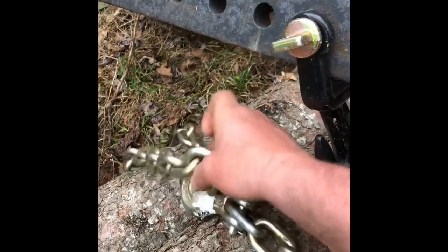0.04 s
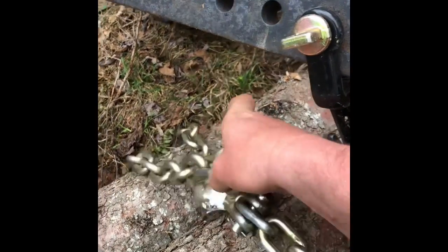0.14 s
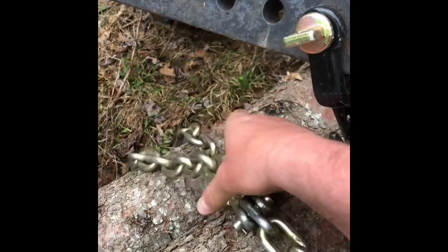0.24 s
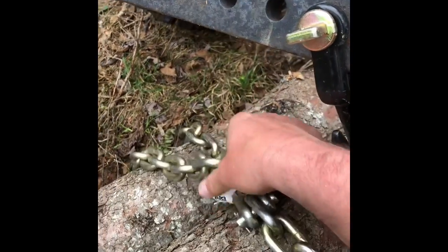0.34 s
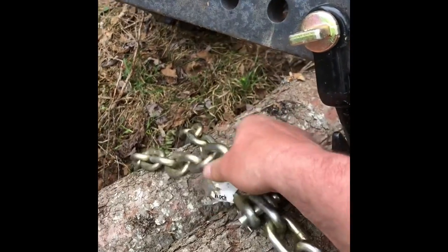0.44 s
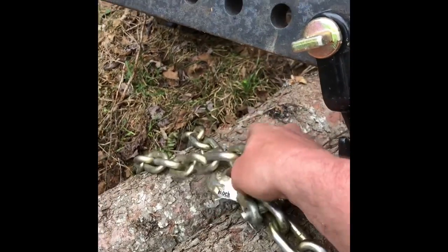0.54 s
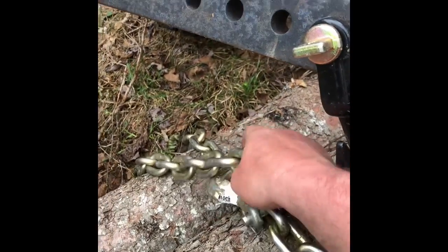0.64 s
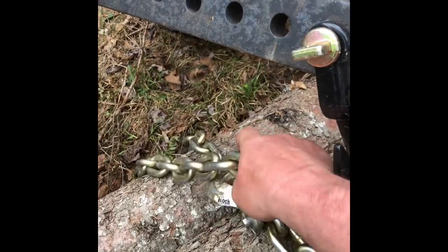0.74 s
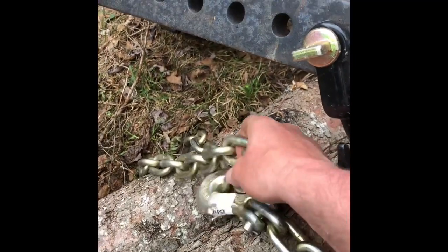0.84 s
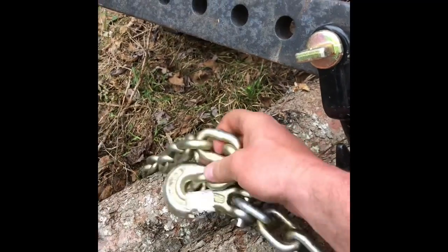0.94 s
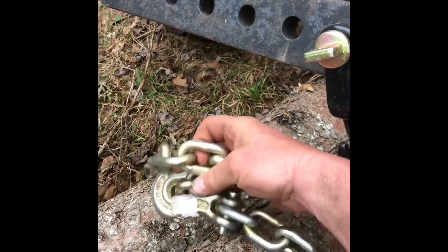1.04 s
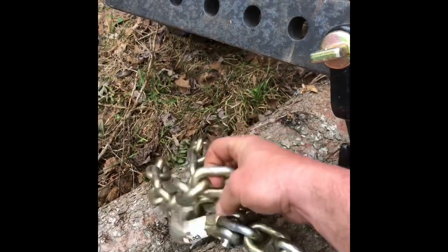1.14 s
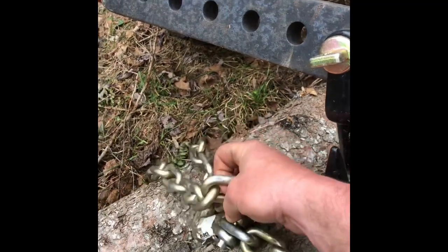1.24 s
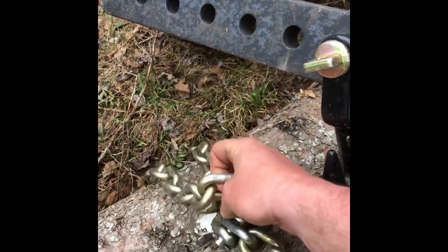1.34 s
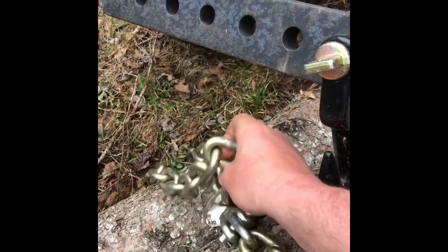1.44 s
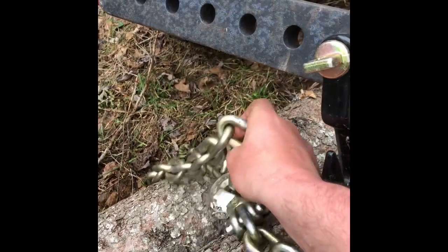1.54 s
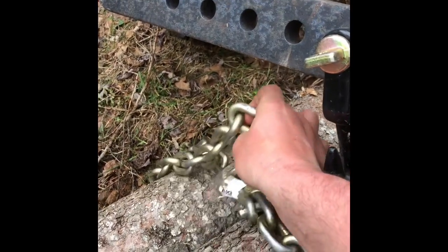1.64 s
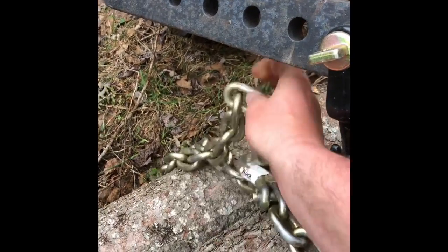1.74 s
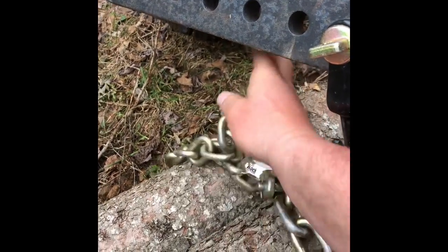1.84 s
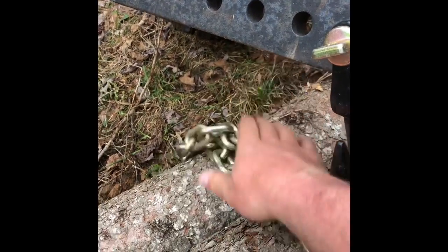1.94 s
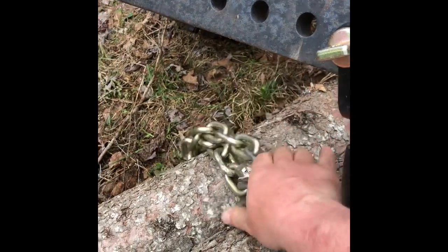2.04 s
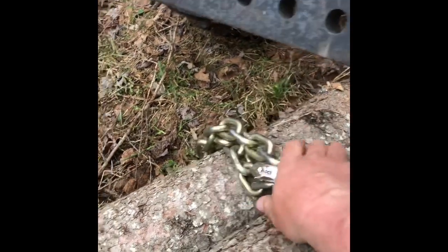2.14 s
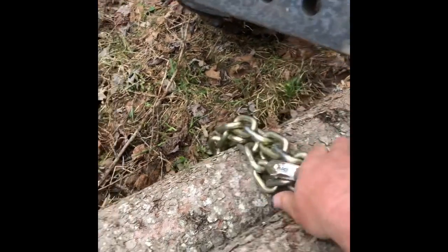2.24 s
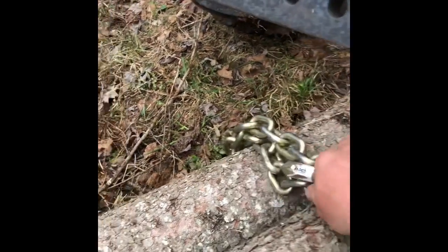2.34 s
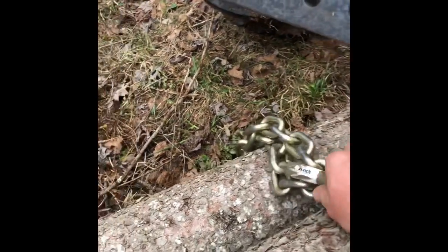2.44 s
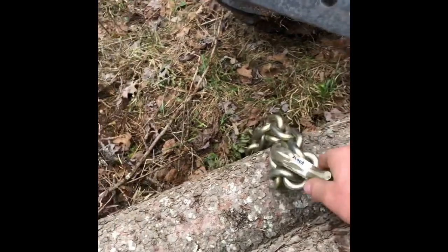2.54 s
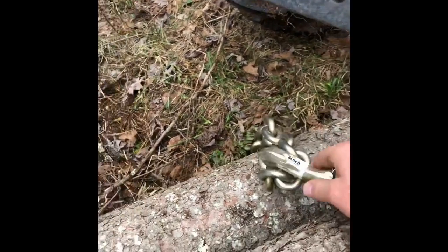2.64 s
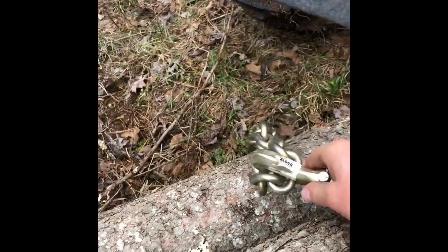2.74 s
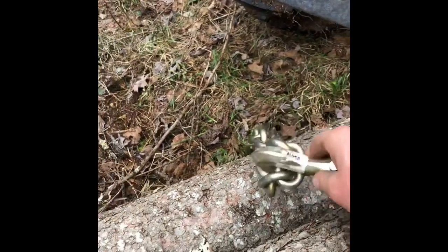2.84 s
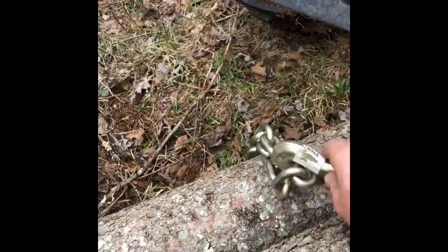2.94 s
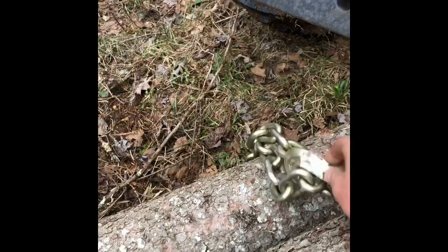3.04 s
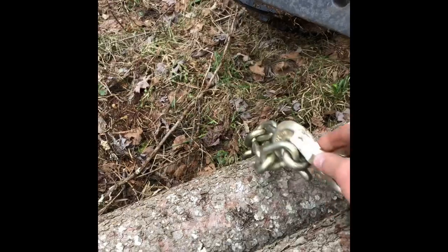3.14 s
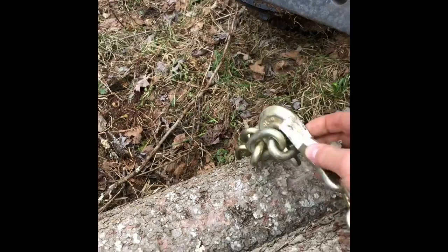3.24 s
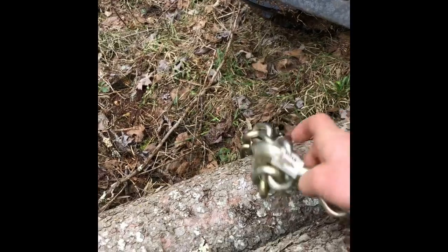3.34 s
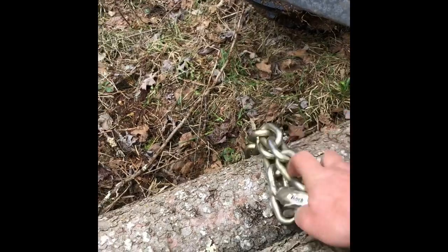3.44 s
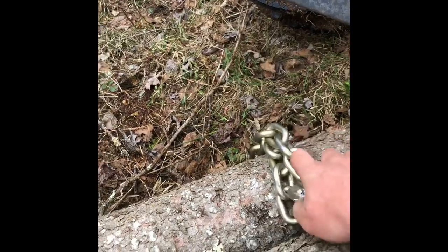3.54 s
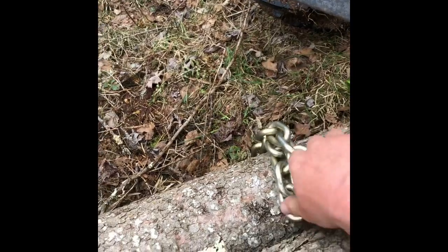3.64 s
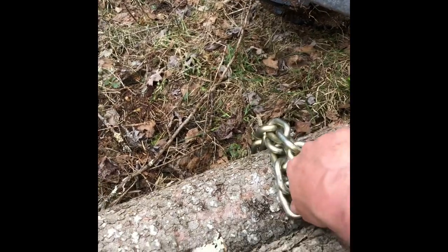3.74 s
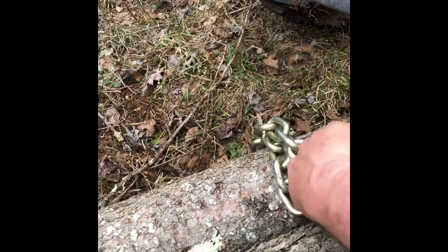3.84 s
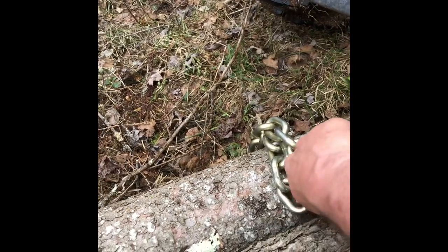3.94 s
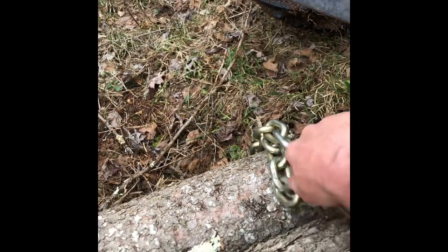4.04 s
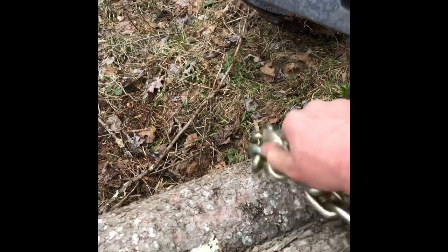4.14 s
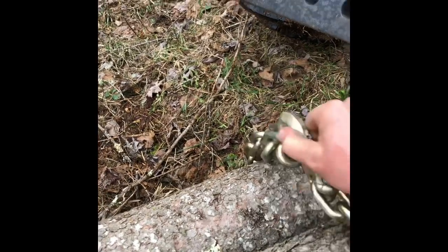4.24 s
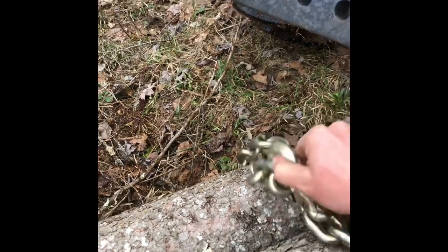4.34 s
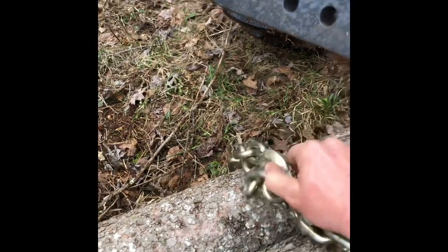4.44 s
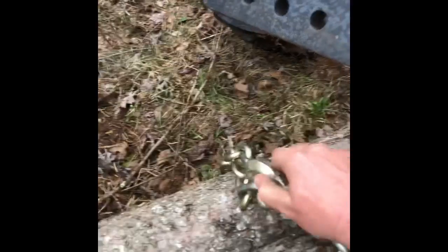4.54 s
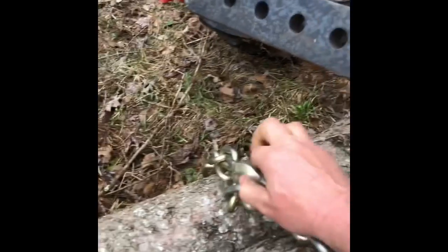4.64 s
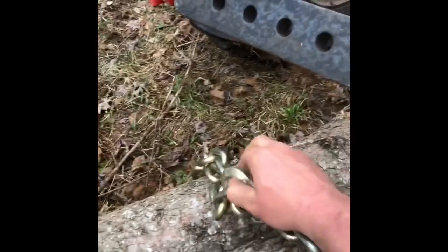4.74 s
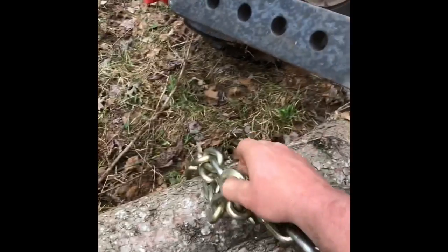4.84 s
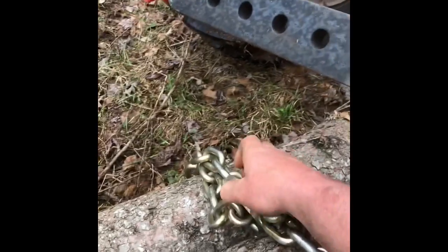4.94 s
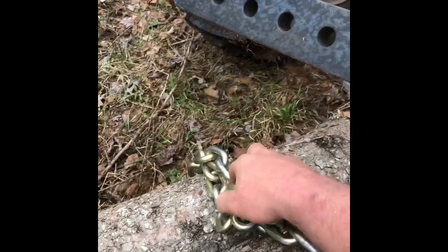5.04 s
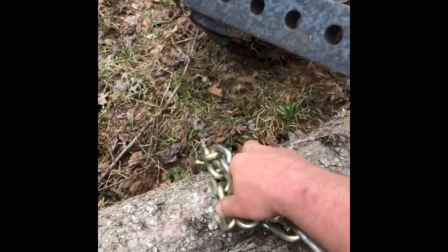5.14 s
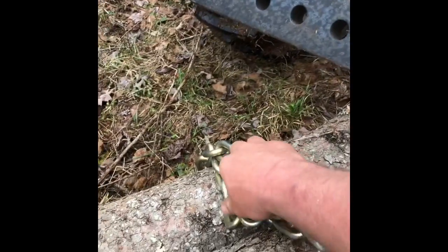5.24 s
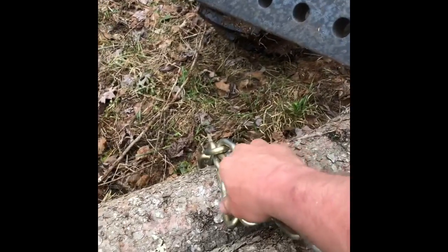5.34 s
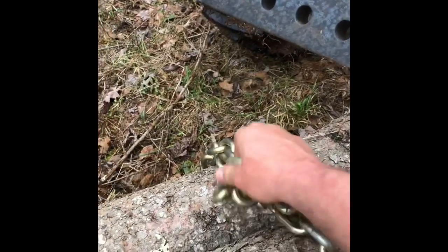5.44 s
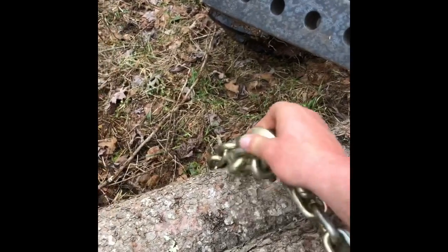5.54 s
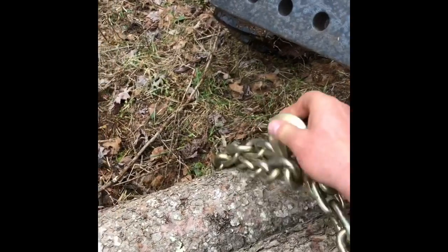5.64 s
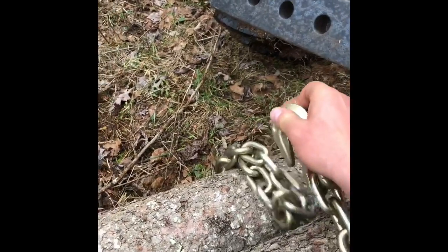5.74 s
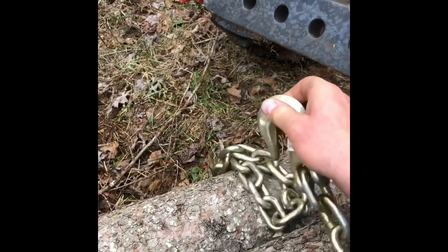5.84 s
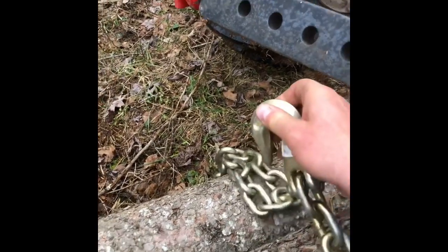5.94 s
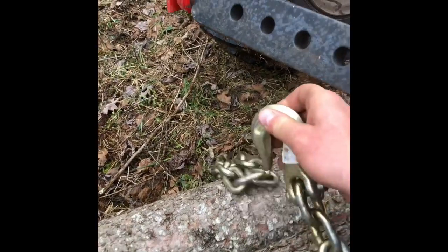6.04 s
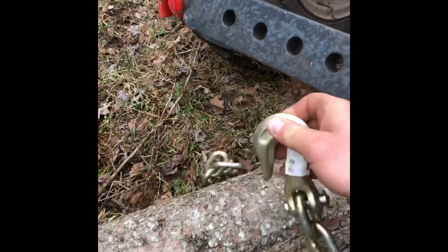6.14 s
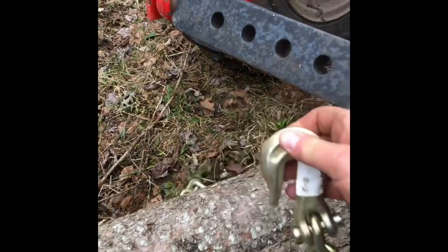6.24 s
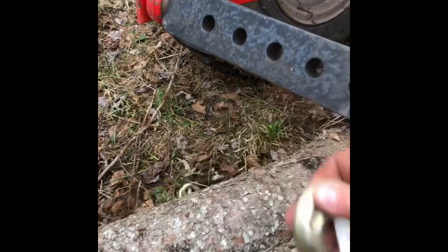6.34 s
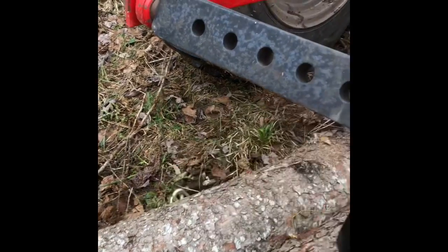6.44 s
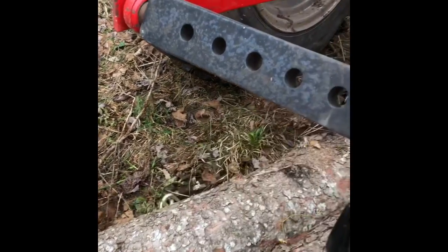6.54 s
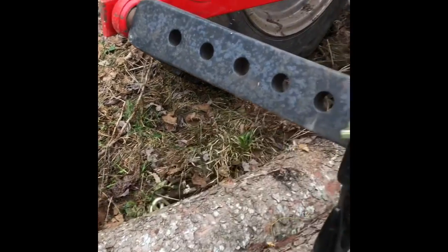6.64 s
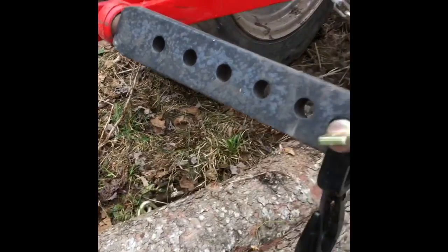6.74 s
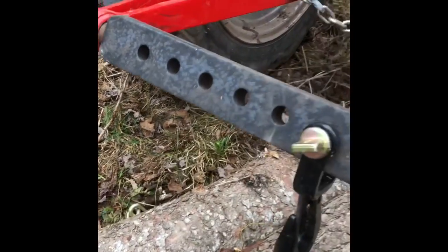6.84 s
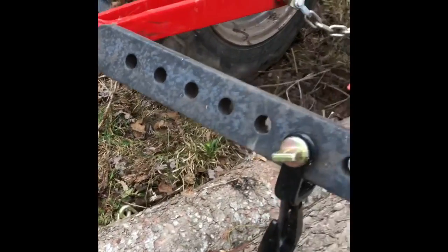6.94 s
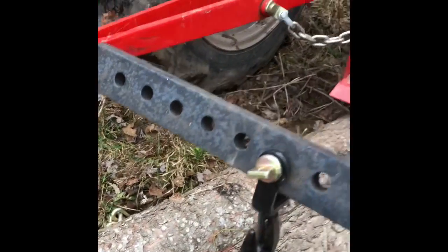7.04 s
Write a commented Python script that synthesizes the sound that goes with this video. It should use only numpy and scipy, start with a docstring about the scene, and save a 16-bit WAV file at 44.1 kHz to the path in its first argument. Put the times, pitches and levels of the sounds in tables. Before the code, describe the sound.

Very close to the microphone, a hand works a steel chain and grab hook round a log in quiet woods. Sharp link ticks and hook clinks cluster early, then a bright jingling rush. Sparser ticks, a hard clank and light fumbling follow, before a loud scrape with thumps and shimmering loose links. A last few hook clinks fade into near silence.

```python
"""A steel chain scrapes and ticks round a log in the woods, over a quiet outdoor floor; a hand works its grab hook.
Scrapes are filtered clicks and noise; link ticks are noise cracks with very high, beating modes.
The heavier hook rings lower when struck: dying sines, shorter and rougher the firmer the grip.
Low thumps and knocks are dying cosines; far metal bangs are noise with resonances and an echo among the trees.
Loose links jingle very high in three runs: random knocks ring six links of slightly different size."""
import sys
import numpy as np
from scipy import signal
from scipy.io import wavfile
from scipy.ndimage import uniform_filter1d, minimum_filter1d

SR = 44100
rng = np.random.default_rng(int(sys.argv[2]) if len(sys.argv) > 2 else 0)


def put_to_file(sound):
    """Save the sound as 16-bit audio at rate SR, in the file named by the first command-line argument."""
    columns = np.atleast_2d(sound).T  # one column per channel
    safe = np.clip(columns, -1, 1)
    whole_steps = np.round(safe * 32767)
    wavfile.write(sys.argv[1], SR, whole_steps.astype(np.int16))


N = 313098

# Modes of one link. Each row: frequency in Hz, relative level in dB.
LINK_MODES = [(12910, 0), (13370, -11), (13690, -2), (14500, -1), (14790, -4)]
# Hook modes, one family per plane of bending. Each row: frequency in Hz, relative level in dB.
HOOK_PLANES = [
    [(4118, -9), (5523, 0.5), (7300, -6), (10180, -8.5)],
    [(3865, -18), (5200, -1), (7100, -5), (10430, -5.5)],
]
# Spectrum of a steel crack. Each row: frequency in Hz, relative density in dB per Hz.
CRACK_SPECTRUM = [(410, -65.5), (700, -34.5), (5220, -7.5), (11400, -0.5), (13200, -15.5), (14900, -8),
                  (16800, -25.5)]
# Spectrum of a scrape. Each row: frequency in Hz, relative density in dB per Hz.
SCRAPE_SPECTRUM = [(150, -13.5), (500, -10), (1310, -12.5), (4360, -2), (12300, -1.5), (13200, 1),
                   (15800, -3), (16500, -34.5)]
LINK_SPREAD = .0022   # size scatter, as a fraction


def amp(db):
    """dB to gain."""
    return 10 ** (np.asarray(db) / 20)


def unit(x):
    """Scale to rms 1."""
    return x / np.sqrt(np.mean(x ** 2) + 1e-20)


def curve(rows):
    """Interpolate (seconds, value) rows at every sample."""
    s, value = np.transpose(rows)
    return np.interp(np.arange(N) / SR, s, value)


def sos_filter(x, order, hz, kind="low"):
    """Butterworth filter."""
    return signal.sosfilt(signal.butter(order, hz, kind, fs=SR, output="sos"), x)


def colour(x, spectrum):
    """Minimum-phase filter of unit energy through (Hz, dB) points, linear in log frequency."""
    hz, db = np.transpose(spectrum)
    grid_hz = np.linspace(0, SR / 2, 1025)
    gain = amp(np.interp(np.log(grid_hz + 1), np.log(hz), db))
    # minimum_phase takes the square root of the response, hence gain squared
    linear = signal.firwin2(2047, grid_hz, gain ** 2, fs=SR)
    taps = signal.minimum_phase(linear, n_fft=2 ** 15)
    taps = taps / np.sqrt(np.sum(taps ** 2))
    return signal.fftconvolve(x, taps)[:len(x)]


def drift(rate):
    """Random curve of rms 1 through rate knots a second (300 at most)."""
    knots = rng.standard_normal(int(N / SR * 300) + 2)
    return unit(np.interp(np.arange(N) / SR * rate, np.arange(len(knots)), knots))


def ring(x, hz, t60):
    """Two-pole resonator: a unit click starts a dying sine of initial height 1."""
    radius = amp(-60 / (t60 * SR))
    w = 2 * np.pi * hz / SR
    return signal.lfilter([0, np.sin(w)], [1, -2 * radius * np.cos(w), radius ** 2], x + 1e-18)


def grains(per_s, uneven_db):
    """Random clicks of uneven size and sign."""
    sizes = amp(uneven_db * np.minimum(rng.exponential(1, N), 3.5))
    sizes = sizes * rng.choice([-1, 1], N)
    return sizes * (rng.random(N) < per_s / SR)


def add(out, s, sound):
    """Mix a short sound in at s seconds."""
    i = int(round(s * SR))
    out[i:i + len(sound)] += sound[:N - i]


def struck(t, modes, t60, luck_db):
    """Dying sines with a soft onset; luck_db shares the force out among the modes."""
    hz, db = modes[:, :1], modes[:, 1:] + luck_db[:, None]
    onset = 1 - np.exp(-t / 0.00022)
    fade = amp(-60 * t / np.maximum(t60, .005)) * onset
    return np.sum(fade * amp(db) * np.sin(2 * np.pi * hz * t), axis=0)


def air():
    """Wind in leaves and far rumble: coloured noise, gently lumpy."""
    # Each row: frequency in Hz, relative density in dB per Hz.
    air_spectrum = [(20, -10), (65, 6.5), (168, 9.5), (806, -4.5), (1660, -2.5), (2850, -11), (4550, -33),
                    (7700, -120)]
    # Each row: time in seconds, level in dB.
    air_level = [(0.0, -47), (0.26, -59), (4.21, -60.5), (4.29, -56.5), (7.1, -67)]
    level_db = curve(air_level) + 0.5 * drift(rate=7.0)
    return amp(level_db) * unit(colour(rng.standard_normal(N), air_spectrum))


def rub_db():
    """Drag level: each tug swells and fades steadily in dB, on top of a faint shifting in the hand."""
    # Tugs over bark and chain. Each row: hardest moment in seconds, level in dB, swell and fade in seconds.
    tugs = [(0.0, -38.5, .1, 0.32), (0.59, -35, 0.054, 0.063), (0.746, -42.5, 0.096, 0.037),
            (0.887, -40.5, 0.061, 0.05), (1.193, -33, 0.24, 0.2), (1.89, -23, 0.089, 0.048),
            (1.97, -33, 0.088, 0.35), (2.101, -30.5, 0.06, 0.096), (3.15, -44, 0.54, 0.051),
            (3.503, -33.5, 0.29, 0.077), (4.13, -42.5, 0.062, 0.39), (4.455, -33.5, 0.46, 0.054),
            (5.074, -38, 0.035, 0.0071), (5.555, -42.5, 0.14, 0.094), (5.719, -20.5, 0.062, 0.014),
            (5.821, -22, 0.1, 0.047), (6.29, -29.5, 0.44, 0.27), (6.631, -30, 0.16, 0.054),
            (6.686, -26, 0.067, 0.14), (6.847, -36.5, 0.099, 0.22)]
    # Faint rub between tugs. Each row: time in seconds, level in dB.
    shifting = [(0, -74), (0.47, -54.5), (0.8, -72), (1.6, -59.5), (2.28, -62), (2.6, -49), (3.2, -59),
                (3.8, -64), (4.6, -55.5), (5.0, -64), (5.35, -68), (7.1, -77)]
    swing_db = 30   # spanned by one swell or fade
    t = np.arange(N) / SR
    power = amp(2 * curve(shifting))
    for s, db, swell_s, fade_s in tugs:
        near = slice(max(int((s - 2 * swell_s) * SR), 0), int((s + 2 * fade_s) * SR))
        before = (s - t[near]) / max(swell_s, .01)
        after = (t[near] - s) / max(fade_s, .01)
        power[near] += amp(2 * (db - swing_db * np.maximum(before, after)))
    return 10 * np.log10(power)


def scrape(level_db):
    """Links dragged over bark and each other: a rub, tiny cracks in clumps, a faint ring of the held hook."""
    level_db = np.maximum(level_db, -76)   # a faint steady hiss remains
    dull = unit(grains(per_s=500, uneven_db=4.5))
    bright = unit(grains(per_s=500, uneven_db=4.5))
    # dull clicks below the split, bright ones above
    grit = sos_filter(dull - bright, 2, 5000) + bright
    rub = unit(colour(.8 * grit + rng.standard_normal(N), SCRAPE_SPECTRUM))
    cracks = unit(colour(grit, CRACK_SPECTRUM))
    held_hook = unit(sum(amp(db) * ring(dull, hz, .012) for hz, db in np.vstack(HOOK_PLANES)))
    steel = np.clip((level_db + 34.0) / 25, 0, 1)   # the harder the drag, the more steel meets steel
    mix = (1 - .6 * steel) * rub + .8 * steel * cracks + amp(-15) * held_hook
    return amp(level_db + 3.3 * drift(rate=55) + 1.5 * drift(rate=9)) * mix


def faint_ticks(level_db):
    """Countless small touches, each with a short dull ring at one of eight pitches; louder in a harder drag."""
    touches = grains(per_s=110, uneven_db=1.0)
    dealt = rng.integers(0, 8, N)
    out = np.zeros(N)
    for k, hz in enumerate(np.geomspace(2300, 11000, 8)):
        out += np.sqrt(hz / 6000) * ring(touches * (dealt == k), hz, 16 / hz)
    # 0.6: share of the rub's swing in dB that the ticks follow
    return amp(-37.5 + 0.6 * (level_db + 43.5)) * out


def ticks():
    """Link on link: a sharp crack with rough chatter, duller on bark, and the two links that met, beating."""
    # Each row: start in seconds, relative crack level in dB, relative link ring level in dB.
    tick_rows = [(0.017, -9.5, -59), (0.033, -20, -70), (0.175, -21.5, -57), (0.191, -14.5, -21),
                 (0.259, -26, -59), (0.2922, -5.5, -32), (0.395, -27, -60), (0.415, -18.5, -84),
                 (0.5435, -4.5, -18), (0.5498, -8.5, -11.5), (0.5754, -6.5, -13), (0.581, -5, -15),
                 (0.602, -16, -24.5), (0.613, -19, -47), (0.815, -26, -76), (0.886, -24, -28.5),
                 (0.925, -13.5, -34), (0.9374, -19, -53), (0.944, -14, -37), (0.979, -21.5, -45),
                 (1.012, -17.5, -34), (1.0924, -29, -50), (1.101, -11, -51), (1.1253, -25, -24),
                 (1.1327, -2.5, -63), (1.1629, -23, -20), (1.1722, -9, -16), (1.18, -2, -12.5),
                 (1.2286, -12, -73), (1.308, -17, -26), (1.331, -27, -80), (1.408, -13, -84),
                 (1.431, -15.5, -80), (1.4752, -19, -33), (1.503, -21, -78), (1.5463, -17, -56),
                 (1.651, -14.5, -38), (1.725, -24, -34), (1.7489, -22.5, -46), (1.773, -12, -33),
                 (1.8053, -4, -9.5), (1.843, -9, -24), (1.8588, -6.5, -16), (1.8795, -4, -5),
                 (1.8967, -2.5, -11), (1.912, -2, -0.5), (1.949, -17, -6), (2.0772, -8, -32),
                 (2.172, -24, -45), (2.3543, -17, -72), (2.388, -9, -33), (2.6675, -12, -32),
                 (2.785, -20.5, -72), (2.933, -16.5, -82.5), (2.983, -17.5, -32), (2.998, -10.5, -51.5),
                 (3.0224, -6, -35), (3.066, -9.5, -24.5), (3.1248, -13.5, -71), (3.2662, -17.5, -30),
                 (3.366, -19, -33), (3.39, -10.5, -27), (3.436, -9.5, -11), (3.467, -4, -35),
                 (3.4952, 0, -11), (3.5554, -13.5, -38), (3.8807, -31, -68), (3.9304, -31.5, -80),
                 (4.04, -22.5, -80), (4.1017, -15, -31), (4.119, -14.5, -74), (4.1424, -8.5, -46),
                 (4.176, -8, -49), (4.221, -21.5, -49), (4.257, -18, -32.5), (4.3166, -16.5, -53),
                 (4.414, -11, -18), (4.4308, -4.5, -10), (4.45, -11.5, -37), (4.514, -14.5, -47.5),
                 (4.756, -20, -48.5), (4.812, -16, -42), (4.876, -26, -38), (4.887, -27, -71),
                 (4.952, -20, -34), (4.982, -17, -48), (4.992, -27, -74), (5.0327, -23.5, -66.5),
                 (5.054, -22, -39.5), (5.229, -20.5, -99), (5.344, -7.5, -36), (5.4863, -20.5, -92),
                 (5.6884, -17, -20), (5.7124, -31, 5), (5.7351, -16, -32), (5.7804, -7.5, -13),
                 (5.822, -5.5, -26), (5.893, -15, -25), (5.902, -2, -1), (5.9224, -23, -25),
                 (5.9774, -26, -26), (6.0457, -30, -40), (6.2205, -26, -19), (6.268, -25, -8),
                 (6.319, -17, -4), (6.347, -11, -2), (6.463, -18.5, -52), (6.67, -13, -33),
                 (6.698, -13, -8), (6.744, -29, -7.5), (6.8323, -22, -43), (6.858, -31, -23)]
    t, link = np.arange(SR // 5) / SR, np.array(LINK_MODES)
    touch_t = t[:1200]
    cracks, rings = np.zeros(N), np.zeros(N)
    for s, crack_db, link_db in tick_rows:
        noise, rough = rng.standard_normal((2, len(touch_t)))
        envelope = amp(-60 * touch_t / 0.00067) + amp(-10.5 + 1.27 * rough - 60 * touch_t / 0.023)
        touch = envelope * noise
        touch = touch * np.linalg.norm(envelope) / np.linalg.norm(touch)

        # each contact has a colour of its own
        knock_hz = np.clip(5000 * np.exp(.35 * rng.standard_normal()), 2000, 12000)
        knock = ring(touch, knock_hz, 6 / knock_hz)
        touch = touch + 1.03 * knock * np.linalg.norm(touch) / np.linalg.norm(knock)

        # a link that lands on bark hardly rings: the crack is duller
        dull = np.clip((crack_db - link_db - 21.5) / 40 + 0.3 * rng.standard_normal(), 0, .7)
        crack = signal.lfilter([np.sqrt(1 - dull ** 2)], [1, -dull], touch)
        add(cracks, s, amp(crack_db - 6) * crack)

        pair = np.vstack([link * [1 + LINK_SPREAD * size, 1] for size in rng.standard_normal(2)])
        t60 = 0.12 * (link[0, 0] / pair[:, :1]) ** 5.0   # higher modes die sooner
        luck_db = 5.1 * rng.standard_normal(len(pair))
        add(rings, s, amp(link_db - 11.0) * struck(t, pair, t60, luck_db))
    return colour(cracks, CRACK_SPECTRUM) + rings


def blows():
    """Hook struck: one mode favoured; a firm grip shortens, detunes, roughens, rings both planes and bounces."""
    # Each row: start in seconds, relative level in dB, favoured pitch in Hz (nearest mode), its t60 in seconds.
    blow_rows = [(0.041, -18.5, 5170, 0.037), (1.039, -26.5, 7080, 0.054), (1.132, 1.5, 6030, 0.017),
                 (1.1701, -8, 5450, 0.082), (1.178, 4, 7256, 0.026), (1.1952, -6.5, 4200, 0.014),
                 (1.4083, -15.5, 4150, 0.021), (1.476, -11, 5380, 0.022), (3.384, -6, 7370, 0.022),
                 (3.4801, -1, 4200, 0.0071), (3.49, -5, 5620, 0.041), (3.4978, 4.5, 5250, 0.027),
                 (4.3789, 0, 5580, 0.033), (4.4119, 0, 7550, 0.008), (4.428, -15, 7300, 0.018),
                 (4.451, -7.5, 5520, 0.014), (4.814, -13, 5570, 0.026), (4.8757, -12.5, 7430, 0.02),
                 (4.9395, -14, 5500, 0.017), (4.9773, -22.5, 7320, 0.076), (5.343, -16, 10500, 0.047),
                 (5.71, 2, 7040, 0.03), (5.75, -14.5, 10400, 0.03), (6.4616, -6.5, 5200, 0.017),
                 (6.673, -12.5, 7360, 0.042), (6.692, -5, 5610, 0.05), (6.7033, 0.5, 5210, 0.053),
                 (6.7111, -5.5, 5260, 0.05), (6.7276, -7.5, 5200, 0.072), (6.748, -12, 10300, 0.044),
                 (6.8565, -5, 5505, 0.16), (6.917, -16, 7080, 0.098)]
    t, hook = np.arange(SR // 5) / SR, np.vstack(HOOK_PLANES)
    in_first_plane = np.arange(len(hook)) < len(HOOK_PLANES[0])
    rattle = drift(rate=300)
    out = np.zeros(N)
    for s, db, loud_hz, t60 in blow_rows:
        force, detune = rng.standard_normal((2, len(hook)))
        k = np.argmin(np.abs(hook[:, 0] - loud_hz))
        grip = np.clip(1.2 - t60 / 0.19, 0, 1)

        other_plane = in_first_plane != in_first_plane[k]
        softness_db = .5 * max(-db - 7.0, 0)   # soft blows favour the one mode more
        share_db = hook[:, 1] - softness_db - (18 - 14 * grip) * other_plane + 3 * force
        share_db[k] = 0

        modes = hook * [1, 0] * (1 + 0.012 * grip * detune[:, None])
        mode_t60 = np.full((len(hook), 1), 0.8 * t60)
        modes[k, 0], mode_t60[k] = hook[k, 0], t60
        sound = struck(t, modes, mode_t60, share_db)

        lag = int((.004 + .002 * abs(rng.standard_normal())) * SR)
        sound[lag:] += 0.48 * grip * sound[:-lag]   # bounce
        near = rattle[int(s * SR):][:len(t)]
        add(out, s, amp(db - 9.5 + 2.7 * grip * near) * sound[:len(near)])
    return out


def thumps():
    """Low thumps and knocks, dying cosines: some die at once, some leave a faint humming tail; all rough."""
    # Each row: start in seconds, relative level in dB, pitch in Hz, cycles until 60 dB down.
    thump_rows = [(0.444, -22, 148, 1.66), (1.131, -41, 1100, 4.9), (1.177, -28, 266, 6),
                  (3.263, -38, 223, 24), (3.63, -32, 136, 3.1), (4.247, -24, 330, 3.5),
                  (5.778, -10.5, 304, 2.9), (5.812, -12, 308, 2.7), (5.832, -39, 274, 93),
                  (6.668, -19.5, 1020, 6.4), (6.694, -31, 107, 4.2)]
    t, out = np.arange(SR // 5) / SR, np.zeros(N)
    for s, db, hz, cycles in thump_rows:
        turns = t * hz
        fade = amp(db - 2.0 - 60 * turns / max(cycles, 1))
        add(out, s, fade * np.tanh(3.4 * turns) * np.cos(2 * np.pi * turns))
    out = sos_filter(out, 2, 110, "high")
    return out * amp(3 * drift(rate=220) + 2 * drift(rate=40))   # loose bark and soil make it rough


def bangs():
    """Distance smears each bang into a wash; treble dies first, bass and the lower resonances last."""
    # Each row: start in seconds, relative level in dB, base t60 in seconds (scaled for each part).
    bang_rows = [(0.877, -32.5, 0.39), (2.43, -38.5, 0.32), (3.124, -29, 0.32), (4.318, -28, 0.26),
                 (4.762, -32.5, 0.19)]
    # Body resonances. Each row: frequency in Hz, width in Hz, relative level in dB.
    far_metal = [(464.5, 8.1, 0.5), (570.3, 14, 2.5), (700, 78, 2.5), (861, 10, -2), (1014, 130, -5),
                 (1370, 120, -2), (2714, 25, 5.5), (3270, 60, 1)]
    # Each row: frequency in Hz, relative density in dB per Hz.
    wash_spectrum = [(88, -50), (150, 10), (345, -50), (442, -8.5), (1100, 5), (1340, 10.5), (1690, 3.5),
                     (6000, -16), (7800, -24)]
    t, wash, tail = np.arange(SR) / SR, np.zeros(N), np.zeros(N)
    rise = 1 - np.exp(-t / 0.0051)
    for s, db, t60 in bang_rows:
        wash_noise, tail_noise = rng.standard_normal((2, SR))
        add(wash, s, amp(db + 0.5 - 60 * t / (0.68 * t60)) * rise * wash_noise)
        early = amp(db - 0.5 - 60 * t / t60)
        late = amp(db - 11 - 60 * t / (7.65 * t60))
        add(tail, s, (early + late) * rise * tail_noise)
    tones = np.zeros(N)
    for hz, width_hz, db in far_metal:
        source = wash if hz > 2000 else tail
        tone = ring(source, hz, np.log(1000) / (np.pi * width_hz))
        tones += amp(db - 39.0) * tone * np.sqrt(width_hz / 40)
    trees = sos_filter(tail, 1, [160, 1300], "band")
    return colour(wash, wash_spectrum) + tones + amp(-8) * trees


def runs_db():
    """Jingle level: silent except while the loose chain runs."""
    # Three runs. Each row: time in seconds, level in dB.
    runs = [
        [(1.83, -50), (1.848, -10), (2.032, -10.5), (2.068, -46), (2.082, -17), (2.3, -82)],
        [(5.69, -35.5), (5.72, -25), (5.776, -13.5), (5.784, -8), (5.908, -6), (6.04, -49)],
        [(6.048, -29), (6.262, -12), (6.372, -14), (6.444, -17), (6.54, -62)],
    ]
    t = np.arange(N) / SR
    levels = [np.interp(t, *np.transpose(run), left=-120, right=-120) for run in runs]
    return np.max(levels, axis=0)


def jingle(level_db):
    """Six loose links, each its own size, knock at random; each knock rings one and adds a small crack."""
    knocks = grains(per_s=220, uneven_db=2.5)
    dealt = rng.integers(0, 6, N)
    rings = np.zeros(N)
    for k, size in enumerate(1 + LINK_SPREAD * np.linspace(-1.3, 1.3, 6)):
        for hz, db in LINK_MODES:
            hit = knocks * (dealt == k) * rng.standard_normal(N)
            rings += amp(db) * ring(hit, hz * size, t60=.24)
    rings = unit(sos_filter(rings, 5, [12300, 15200], "band"))
    crack_t60_s = .012
    envelope = signal.lfilter([1], [1, -amp(-60 / (crack_t60_s * SR))], np.abs(knocks))
    cracks = unit(colour(envelope * rng.standard_normal(N), SCRAPE_SPECTRUM))
    return amp(level_db) * (amp(-27) * cracks + rings)


def scene():
    """All sources reach one microphone."""
    drag_db = rub_db()
    chain = scrape(drag_db) + faint_ticks(drag_db) + ticks() + blows() + jingle(runs_db())
    return (air() + chain + thumps() + bangs())[None]


def record(dry):
    """Microphone drops the deepest bass, a look-ahead limiter holds peaks down, then the top is cut."""
    ceiling, cutoff_hz = .95, 16900   # ceiling holds ahead of the top cut
    thin = sos_filter(dry, 2, 60, "high")
    gain = np.minimum(1, ceiling / (np.abs(thin) + 1e-9))
    gain = minimum_filter1d(gain, size=441)
    limited = thin * uniform_filter1d(gain, size=221)
    return signal.sosfilt(signal.cheby2(16, 70, cutoff_hz, fs=SR, output="sos"), limited)


dry = scene()
out = record(dry)
put_to_file(out)
```